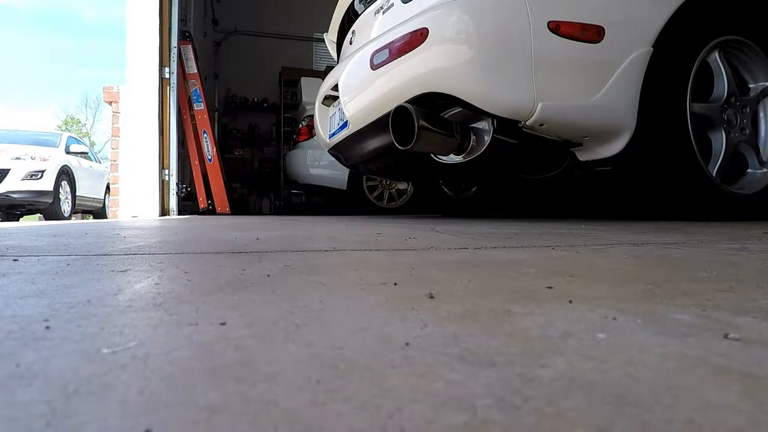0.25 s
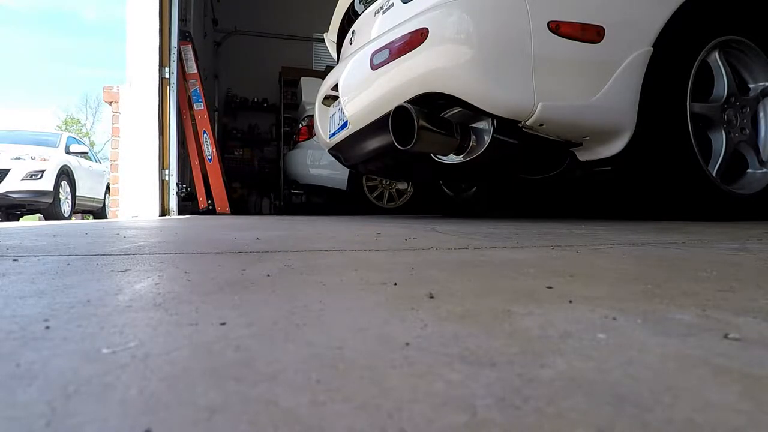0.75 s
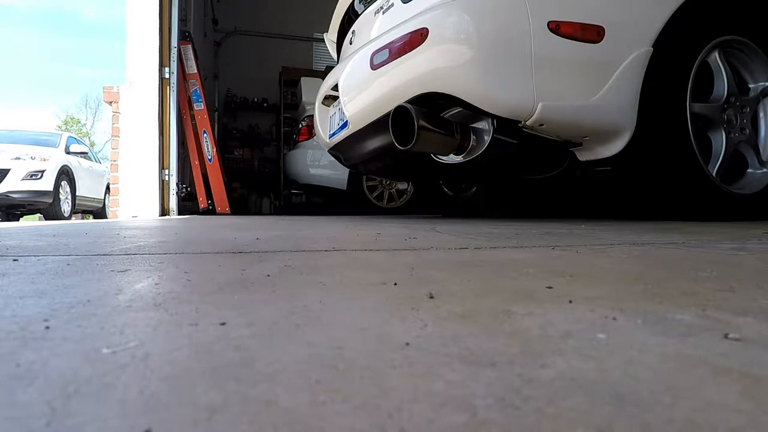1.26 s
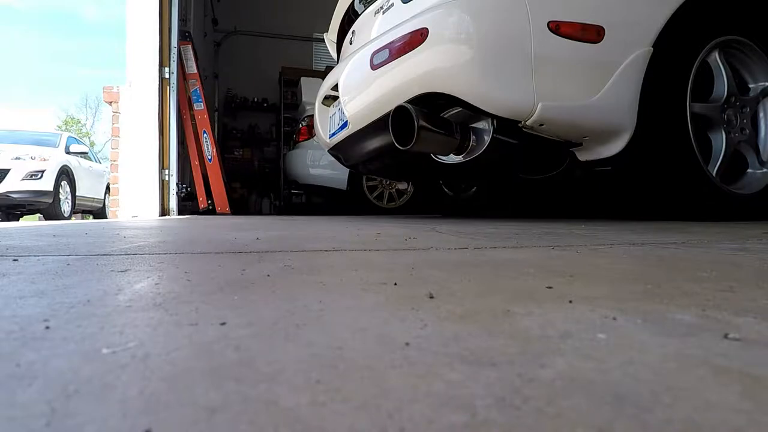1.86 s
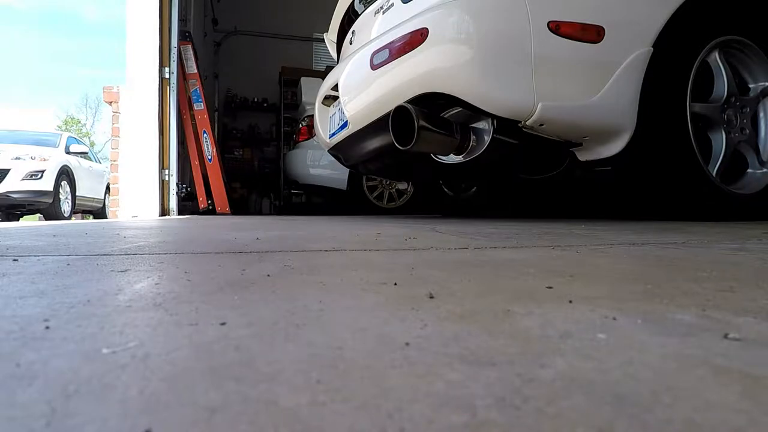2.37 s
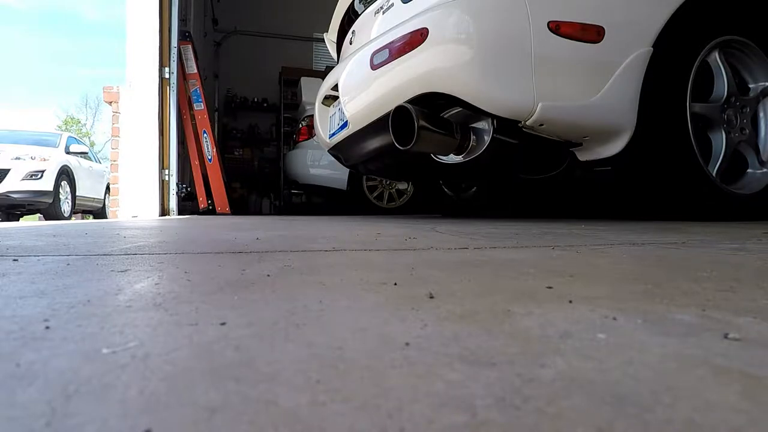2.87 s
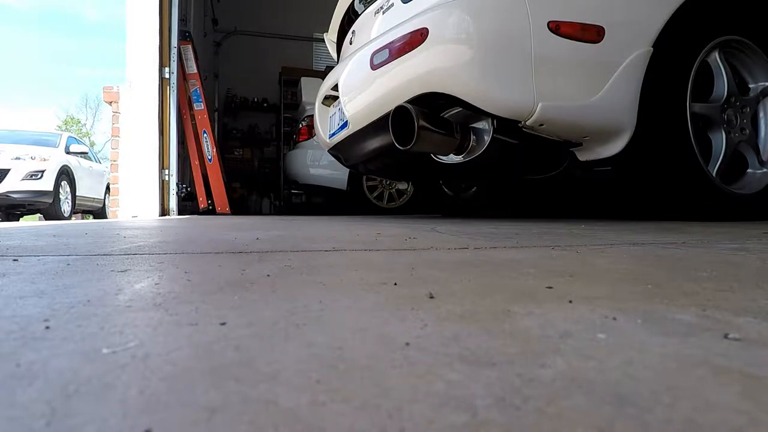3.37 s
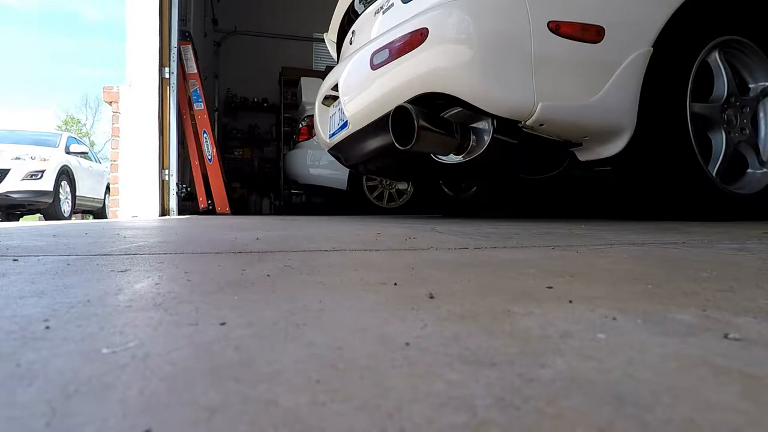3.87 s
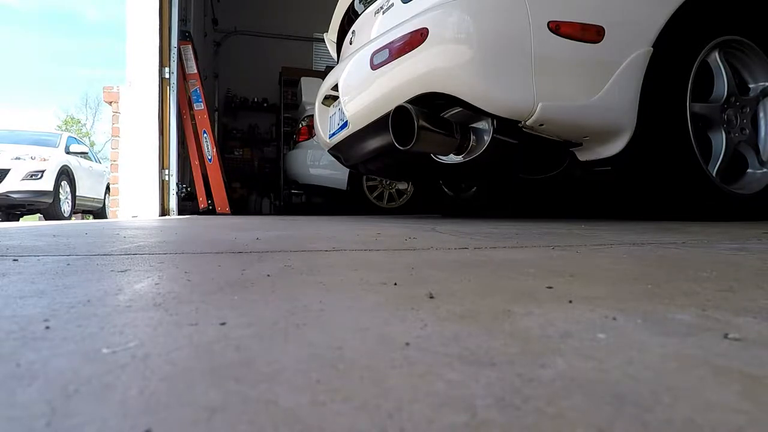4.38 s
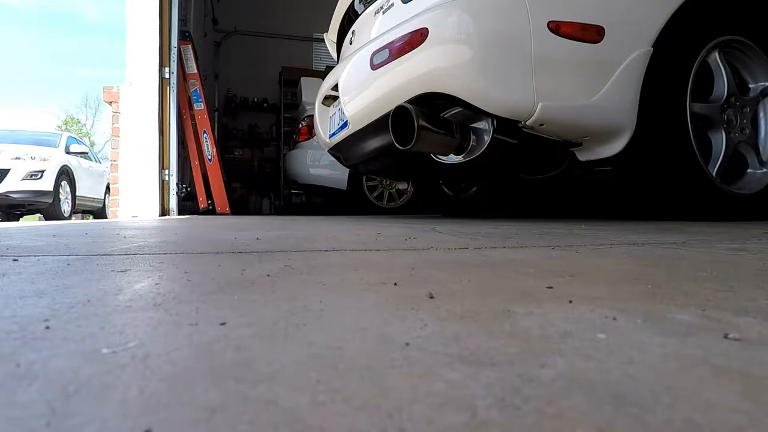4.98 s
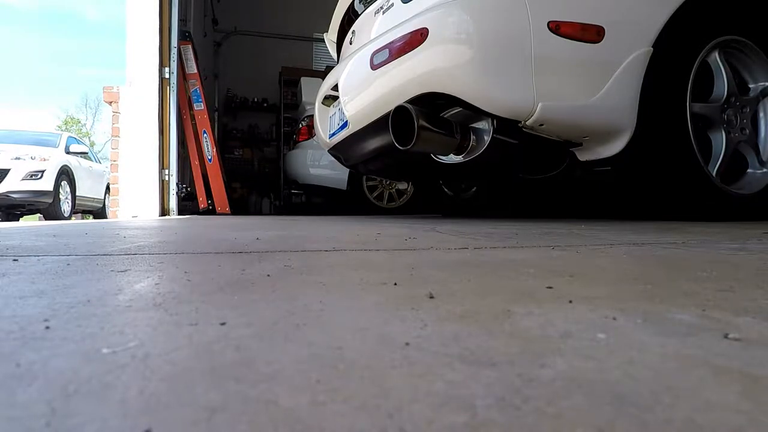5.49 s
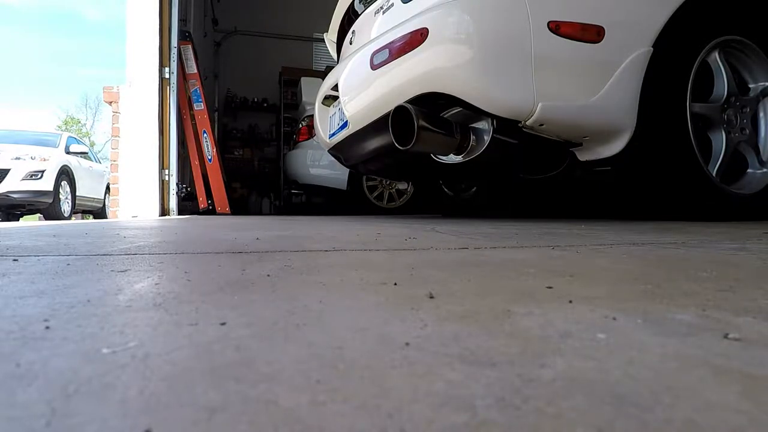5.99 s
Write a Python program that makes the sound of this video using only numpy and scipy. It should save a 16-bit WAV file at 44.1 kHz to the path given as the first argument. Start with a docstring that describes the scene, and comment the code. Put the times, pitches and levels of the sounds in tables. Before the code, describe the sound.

Two short revs from a throaty car exhaust, dropping back to an uneven idle with sputters and one loud backfire.

```python
"""A garage, down on the floor behind the tailpipe: a rotary engine is blipped twice.
Each firing sends a pulse down the exhaust, which hums, barks, thuds and rasps; uneven burns and
misfires make it lope. Gas roar and engine hiss fill the room, and on lift-off unburnt fuel pops
in the hot pipe and slaps off the concrete. A faint high hiss sits steady in the background,
and a quick compressor ducks the mix after a loud bang."""
import sys
import numpy as np
from scipy import signal
from scipy.io import wavfile
from scipy.ndimage import uniform_filter1d

SR = 44100
rng = np.random.default_rng(int(sys.argv[2]) if len(sys.argv) > 2 else 0)


def master(y):
    """Save y as 16-bit WAV."""
    cut = np.clip(np.atleast_2d(y).T, -1, 1)
    pcm = np.round(cut * 32767)  # scale
    wavfile.write(sys.argv[1], SR, pcm.astype(np.int16))


N = 275184

# The two blips. Each row: time in seconds, firings per second, throttle 0-1, burn unevenness 0-1.
REVS = [(0, 43.87, 0.5, 0), (.24, 42.37, 0.3, 0.53), (.45, 46.74, .6, .25), (.69, 67.5, 0.99, 0.19),
        (.99, 81.77, 0.5, 0.33), (1.2, 76.3, 0.16, .5), (1.45, 67.67, 0.35, 0.42), (1.6, 61.03, 0.57, .2),
        (1.93, 55.8, 0.07, 0.37), (2.12, 50.54, 0.07, 0.34), (2.5, 46.72, 0.15, 0.43),
        (2.9, 45.05, 0, 0.47), (3.04, 45.93, 0.34, 0.22), (3.3, 43.92, .25, 0.35),
        (3.49, 42.63, 0.21, 0.51), (3.75, 44, 0.4, 0.3), (4.07, 61, 0.82, 0.11), (4.31, 76.45, 1, .18),
        (4.55, 87.05, 0.99, 0.29), (4.79, 92.3, .9, 0.19), (4.9, 86.37, 0.45, 0.67),
        (5.14, 75.1, 0.33, 0.22), (5.35, 61.9, 0, 0.21), (5.6, 55.43, 0, 0.43), (5.94, 50.74, 0, 0.33),
        (6.24, 45.72, 0, 0.4)]
# Firings that miss. Each row: time in seconds, depth of the dip in dB.
MISFIRE_DIPS = [(0.741, -1), (1.038, -8.5), (1.101, -8.5), (1.232, -3), (2.098, -5), (2.447, -8.5),
                (2.522, -8.5), (2.646, -7.5), (3.165, -6.5), (3.22, -16.5), (4.566, -5), (5.143, -9),
                (5.572, -2.5), (5.99, -3.5), (6.124, -7.5)]
# Fuel cuts on the overrun. Each row: start and end in seconds, bark drop in dB, fundamental shift in dB.
FUEL_CUTS = [(1.156, 1.395, -5, -2.5), (1.477, 1.626, -10.5, 6), (1.743, 1.795, -10, 7),
             (1.913, 1.97, -7, 9), (2.048, 2.16, -5, -5.5), (4.76, 4.821, -18.5, 2),
             (4.855, 5.029, -8.5, -27.5), (5.029, 5.187, -13, -2.5), (5.179, 5.356, -14.5, -0.5),
             (5.469, 5.571, -10.5, 8.5)]
# The hum's fundamental and its octave. Each row: firings per second, base level in dB.
FUNDAMENTAL_LEVEL = [(43, -17.5), (50, -14), (60, -14), (70, -11), (82, -9.5), (93, -9)]
OCTAVE_LEVEL = [(43, -8), (50, -9.5), (60, -11), (66, -17.5), (78, -15.5), (93, -19.5)]
# Upper exhaust, lower exhaust and tailpipe modes. Each row: pitch in Hz, width in Hz, relative dB.
BARK_MODES = [(179.9, 38.5, 2.5), (210.7, 25.5, 3), (236.5, 11.1, -0.5), (273, 14.1, 1),
              (306.2, 23.8, -2.5)]
THUD_MODES = [(48.8, 23.7, 3.5), (87.4, 40.7, 4.5), (116.5, 45, 2)]
TAILPIPE_MODES = [(403.3, 13, 7), (489.4, 22, -7), (601, 48, -4.5), (755, 42, -11), (1037, 41, -15.5)]
# Colour of the gas roar, engine hiss and background hiss. Each row: frequency in Hz, relative dB.
ROAR_COLOUR = [(200, -29.5), (340, 2), (362, -2.5), (399, 1.5), (443, -20.5), (475, 0.5), (542, -9.5),
               (607, -12.5), (664, -16.5), (769, -14), (928, -17), (1800, -21), (2340, -61.5), (3960, -120)]
HISS_COLOUR = [(1000, -2.5), (1700, -3), (1940, -6.5), (2610, -8.5), (3350, -12), (5660, -11.5),
               (7620, -6.5), (8240, -13), (9780, -18.5), (11000, -27), (14300, -66), (22000, -120)]
BACKGROUND_COLOUR = [(7000, -30), (9500, -7.5), (11500, -14.5), (13400, -13.5), (14800, -22)]
# The fader ride on the engine hiss. Each row: time in seconds, level in dB.
HISS_RIDE = [(0, -43), (.5, -40.5), (1.24, -37.5), (1.5, -39), (2.14, -45.5), (2.7, -43.5), (3.21, -44),
             (4.11, -40.5), (4.58, -36), (4.82, -33.5), (4.87, -36.5), (5.3, -45), (5.65, -46.5),
             (6.24, -44.5)]
# Stereo width of the noise. Each row: frequency in Hz, left-right likeness 0-1.
STEREO_LIKENESS = [(400, .97), (650, .87), (1200, .68), (2100, .56), (4000, .3), (8000, .15)]
# Stereo phase of the noise. Each row: frequency in Hz, lead of the left side in radians.
LEFT_LEAD = [(300, -0.52), (690, 0.6), (1210, 1.73), (2070, 1.28), (3450, -1.2), (8000, -2.5)]
# Stereo balance of the noise. Each row: frequency in Hz, left over right in dB.
BALANCE = [(400, -2), (700, -9), (1300, -6), (2500, -1.8), (5000, -2), (12000, -2.5)]
# Backfires. Each row: start in seconds, thump gain in dB, crackle gain in dB, thump pitch in Hz,
# first swing outward (+1) or inward (-1).
BACKFIRES = [(.785, -1.5, -48, 151.7, 1), (1.11, -5.5, -31, 187, 1), (1.122, -3.5, -20.5, 97, -1),
             (1.1339, -1.5, -31, 242, 1), (1.995, -2, -35, 163, -1), (4.831, 11, -7, 213, 1),
             (4.944, 1, -28.5, 105, -1)]

TIME = np.arange(N) / SR
LOPSIDED = 0.2  # one rotor hits a little harder
RAMP_S = 0.022  # how fast a fuel cut or the roar's surge comes in


def gain_of(db):
    """Decibels to a factor."""
    return 10 ** (np.asarray(db) / 20)


def unit_rms(x):
    """Scales to rms 1."""
    return x / np.sqrt(np.mean(x ** 2) + 1e-20)


def curves(rows):
    """A timed table as one automation curve per value column."""
    times, *columns = np.transpose(rows)
    return [np.interp(TIME, times, column) for column in columns]


def at_hz(points, hz):
    """Looks up a table on a log-frequency axis."""
    freqs, values = np.transpose(points)
    return np.interp(np.log(hz + 1), np.log(freqs + 1), values)


def ring(pulses, modes):
    """Pulses ring a set of damped pipe modes."""
    t = np.arange(6000) / SR
    tube = sum((-1) ** k * gain_of(db) * width * np.exp(-np.pi * width * t) * np.sin(2 * np.pi * hz * t)
               for k, (hz, width, db) in enumerate(modes))
    return signal.oaconvolve(pulses, tube)[:N]


def band(x, lo_hz, hi_hz, order):
    """Band-pass filter."""
    return signal.sosfilt(signal.butter(order, [lo_hz, hi_hz], "band", fs=SR, output="sos"), x)


def stereo_noise(colour, patchy_db, size):
    """Coloured noise with drifting louder and softer patches; its mono mix has rms 1."""
    hz = np.fft.rfftfreq(size, 1 / SR)
    a, b, c, d, patches = rng.standard_normal((4 * N // size + 5, len(hz), 5)).T
    patches = unit_rms(uniform_filter1d(uniform_filter1d(patches, size=6, axis=0), size=10, axis=1))
    likeness = at_hz(STEREO_LIKENESS, hz)[:, None]
    delay = np.exp(-1j * at_hz(LEFT_LEAD, hz))[:, None]
    left = a + 1j * b
    right = likeness * left * delay + np.sqrt(1 - likeness ** 2) * (c + 1j * d)
    pan = gain_of(at_hz(BALANCE, hz) / 2)[:, None]
    shape = gain_of(at_hz(colour, hz)[:, None] + patchy_db * patches)
    spectra = np.array([left * pan, right / pan]) * shape
    both = signal.istft(spectra, nperseg=size, noverlap=size - size // 4)[1][:, :N]
    return both / np.sqrt(np.mean(both.mean(0) ** 2))


def exhaust_hum(firings, scatter, fundamental_db, octave_db):
    """The firing rate and its octave as low tones, blurred by timing scatter."""
    phase = 2 * np.pi * (firings + 0.13 * uniform_filter1d(scatter, size=900))
    fundamental = gain_of(fundamental_db) * np.sin(phase - .6)
    octave = gain_of(octave_db) * np.sin(2 * phase + 1.12)
    return np.sqrt(2) * (fundamental + octave)


def exhaust_bark(pulses, firings, bright_db):
    """Firing pulses ring the upper exhaust modes, with a shelf for brightness."""
    bark = band(ring(pulses, BARK_MODES), 116.7, 334.5, order=4)
    octave = np.exp(4j * np.pi * firings)  # notched out here, since the hum carries it
    bark = bark - 2 * (octave * uniform_filter1d(bark / octave, size=1500)).real
    body = signal.sosfiltfilt(signal.butter(2, 235, fs=SR, output="sos"), bark)
    return unit_rms(body + gain_of(bright_db) * (bark - body))


def exhaust_thud(ticks, rotor, luck):
    """Uneven burns kick the lower exhaust modes one way or the other: the lope."""
    kicks = ticks * (np.sign(luck) + 1.1 * LOPSIDED * rotor)
    return unit_rms(band(ring(kicks, THUD_MODES), 35.7, 148.4, order=3))


def tailpipe_rasp(pulses, rotor, hz):
    """The tailpipe rings, favouring one rotor and growing with the revs."""
    ringing = ring(pulses * (1 + 0.75 * rotor), TAILPIPE_MODES)
    return (hz / 60) ** 1.2 * unit_rms(band(ringing, 316, 1400, order=3))


def gas_roar(gusts, throttle, cut_db):
    """Gas rushes out with each firing, and surges as the throttle snaps shut on the second blip."""
    surge_s, hold_s, fade_s = 4.84, 0.12, 0.12
    rise = (TIME - surge_s) / RAMP_S
    fall = 1 + (surge_s + hold_s - TIME) / fade_s
    surge = np.clip(np.minimum(rise, fall), 0, 1)
    level_db = -42 + 6 * throttle + 0.22 * cut_db + 11.5 * surge
    return gain_of(level_db) * gusts * stereo_noise(ROAR_COLOUR, patchy_db=4.5, size=2048)


def engine_hiss(gusts):
    """Hiss that flutters lightly with the firings."""
    level_db, = curves(HISS_RIDE)
    return gain_of(level_db) * gusts ** .3 * stereo_noise(HISS_COLOUR, patchy_db=1.0, size=512)


def background_hiss():
    """A faint, steady, high background hiss."""
    return gain_of(-67) * stereo_noise(BACKGROUND_COLOUR, patchy_db=3, size=512)


def misfires(width_s=0.0059):
    """A gain curve with a brief hole for each firing that misses."""
    return gain_of(sum(db * np.exp(-((TIME - s) / width_s) ** 2 / 2) for s, db in MISFIRE_DIPS))


def backfires(length=2000):
    """Fuel lights in the hot pipe: one pressure swing, with a crackle for as long as it lasts."""
    t = np.arange(length) / SR
    out = np.zeros((2, N))
    for start_s, thump_db, crackle_db, hz, direction in BACKFIRES:
        swell = np.sin(np.pi * np.minimum(hz * t / 0.95, 1))
        thump = direction * np.sin(2 * np.pi * hz * t) * swell
        white = rng.standard_normal((3, length))  # centre, left, right
        grit = (white[0] + 0.43 * white[1:]) * np.sqrt(abs(swell))
        crackle = (4 * band(grit, 490, 1464, order=2) + 1.86 * band(grit, 1220, 2480, order=2)
                   + 0.37 * band(grit, 1900, 5300, order=3))
        at = round(start_s * SR)
        out[:, at:at + length] += gain_of(thump_db) * thump + gain_of(crackle_db) * crackle
    return out


def garage_slap(x, decay_s=0.12):
    """Sparse reflections of random sign off concrete and walls."""
    taps = np.zeros((2, 12000))
    at = np.arange(200, 11980, 20) + rng.integers(0, 20, (2, 589))
    np.put_along_axis(taps, at, rng.choice([-1., 1.], at.shape), 1)
    taps *= gain_of(-60 * np.arange(12000) / SR / decay_s)
    return signal.fftconvolve(x, taps / np.linalg.norm(taps[0]), axes=1)[:, :N]


def fuel_cuts():
    """Fuel shuts off on the overrun: dB curves for the bark's drop and the fundamental's shift."""
    gates = [np.clip(np.minimum(TIME - start, end - TIME) / RAMP_S + .5, 0, 1)
             for start, end, _, _ in FUEL_CUTS]
    return np.transpose(FUEL_CUTS)[2:] @ gates


def widen(bass):
    """The bass reaches left and right slightly out of phase, a touch louder on the right."""
    quadrature = signal.hilbert(np.pad(bass, 4096, "reflect")).imag[4096:-4096]
    return bass * gain_of([[-.15], [.15]]) + gain_of(-24.5) * quadrature * [[1], [-1]]


def scene():
    """Revs, throttle and fuel cuts play the exhaust; roar, hiss and backfires sit on top."""
    hz, throttle, uneven = curves(REVS)
    cut_db, shift_db = fuel_cuts()
    firings = np.cumsum(hz) / SR
    count = firings.astype(int)
    rotor = (-1.) ** count  # the two rotors fire in turn
    luck = np.sqrt(3) * rng.uniform(-1.046, 1, (count[-1] + 1, 3))
    burn_luck, thud_luck, timing_luck = luck[count].T
    burn = 1 + uneven * burn_luck  # uneven burns vary in strength and land off time
    scatter = uneven * timing_luck
    ticks = np.diff(count, prepend=-1) / np.sqrt(hz)  # equal power at any speed
    landing = np.clip(np.arange(N) + (scatter * 0.0011 * SR).astype(int), 0, N - 1)
    pulses = np.bincount(landing, ticks * (burn + LOPSIDED * rotor), N)
    gusts = 1 + 0.083 * np.cos(2 * np.pi * firings) * burn

    ragged_db = -16.5 * uneven  # ragged burns thin the hum and feed the thud
    thud_db = -20.5 + 13.5 * uneven + 0.45 * cut_db
    fundamental_db = at_hz(FUNDAMENTAL_LEVEL, hz) + 3.5 * throttle + shift_db + ragged_db
    octave_db = at_hz(OCTAVE_LEVEL, hz) + 1.5 * throttle + 0.57 * cut_db + ragged_db
    bark_db = -19 + 4 * throttle + cut_db

    hum = exhaust_hum(firings, scatter, fundamental_db, octave_db)
    bark = gain_of(bark_db) * exhaust_bark(pulses, firings, bright_db=-4 + 7 * throttle)
    thud = gain_of(thud_db) * exhaust_thud(ticks, rotor, thud_luck)
    rasp = gain_of(bark_db + 3.5 * throttle) * tailpipe_rasp(pulses, rotor, hz)
    air = gas_roar(gusts, throttle, cut_db) + engine_hiss(gusts) + background_hiss()
    dips = misfires()
    exhaust = widen((hum + bark + thud) * dips) + rasp * dips * gain_of([[-23], [-26]])
    bangs = backfires()
    return exhaust + air + bangs + gain_of(-20) * garage_slap(bangs)


def record(dry):
    """A quick 2:1 compressor, soft clipping, a short fade-out and a steep high cut."""
    threshold_db, attack_s, high_cut_hz = -3.5, 0.00077, 14900
    peak_db = 20 * np.log10(abs(dry).max(0) + 1e-9)
    fall_db = 81.0 * TIME  # the held peak sinks 81 dB a second
    over_db = np.maximum(np.maximum.accumulate(peak_db + fall_db) - fall_db - threshold_db, 0)
    lag = np.exp(-1 / (attack_s * SR))
    held = dry / gain_of(0.5 * signal.lfilter([1 - lag], [1, -lag], over_db))
    rounded = held / (1 + held ** 6) ** (1 / 6)
    faded = rounded * np.minimum(np.arange(N, 0, -1) / 400, 1)
    padded = np.pad(faded, [(0, 0), (255, 255)], "reflect")
    high_cut = signal.firwin(511, high_cut_hz, window=("kaiser", 9), fs=SR)
    return signal.oaconvolve(padded, high_cut[None], "valid")


dry = scene()
out = record(dry)
master(out)
```